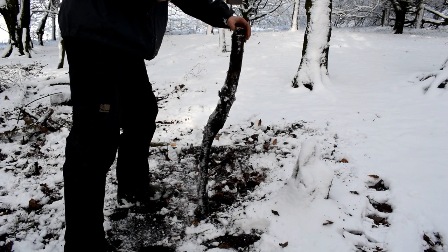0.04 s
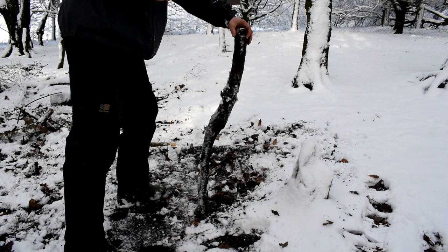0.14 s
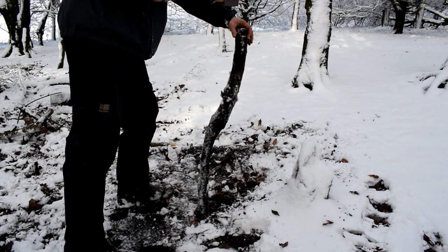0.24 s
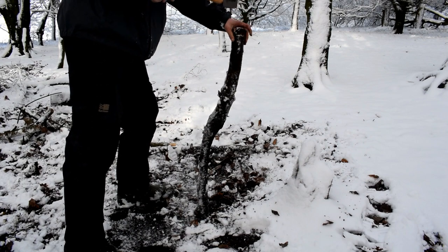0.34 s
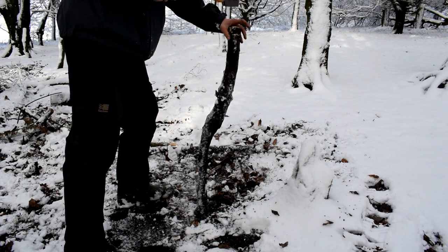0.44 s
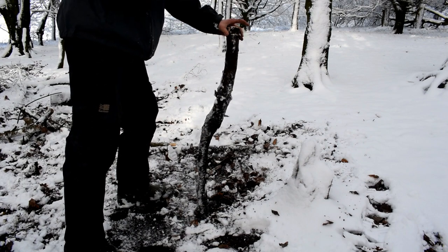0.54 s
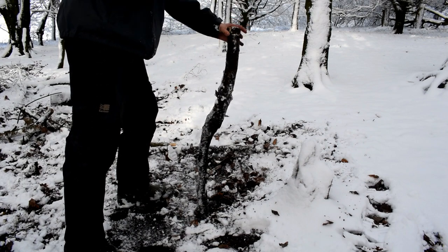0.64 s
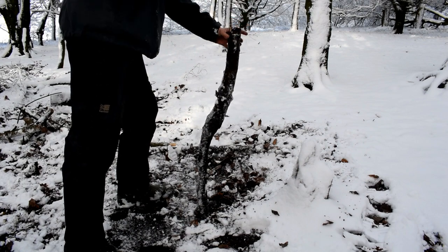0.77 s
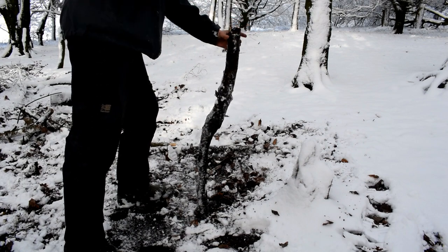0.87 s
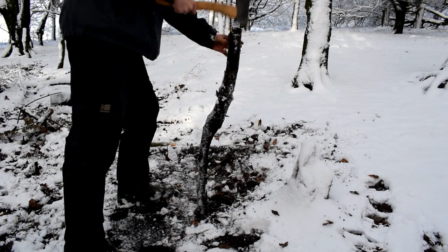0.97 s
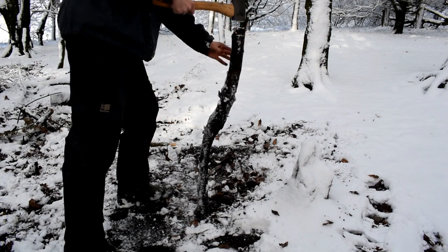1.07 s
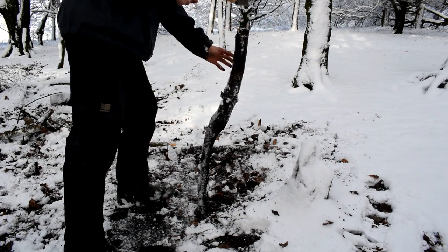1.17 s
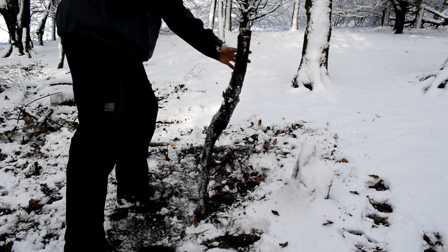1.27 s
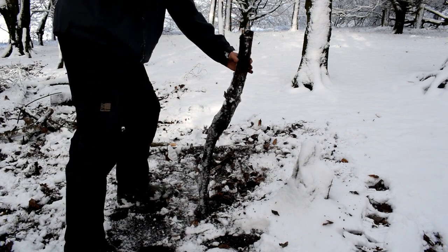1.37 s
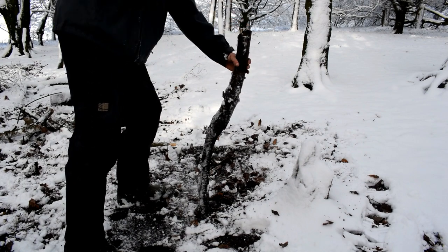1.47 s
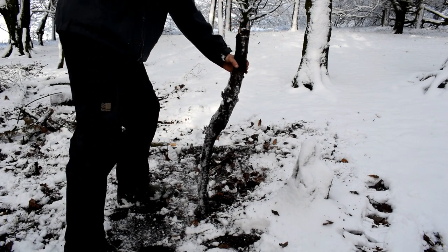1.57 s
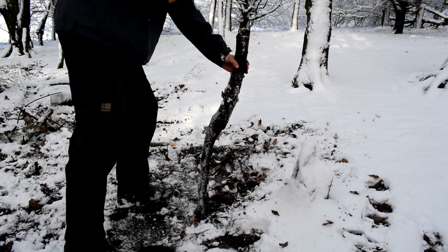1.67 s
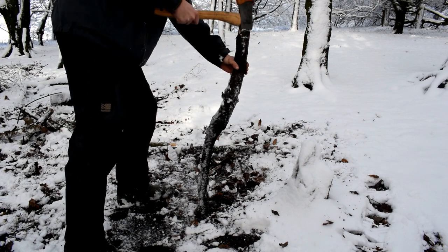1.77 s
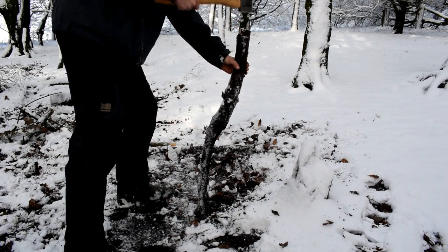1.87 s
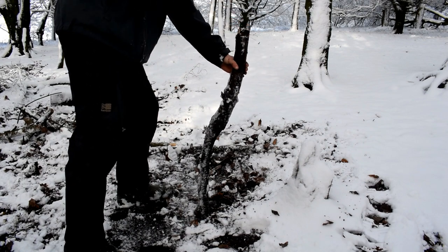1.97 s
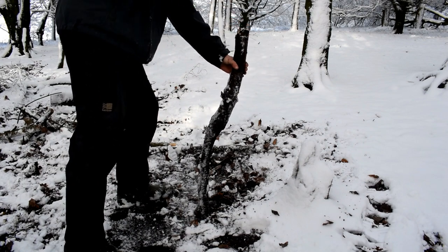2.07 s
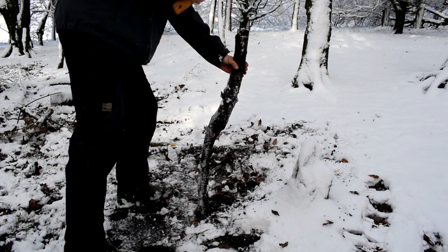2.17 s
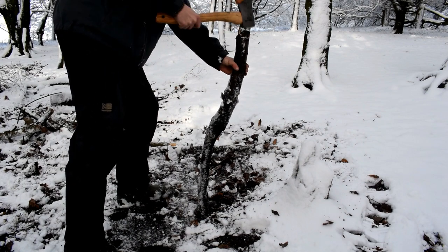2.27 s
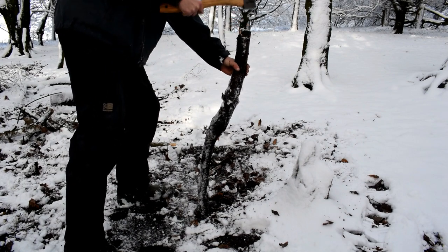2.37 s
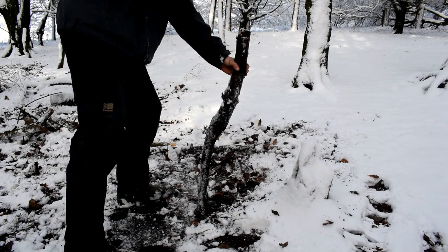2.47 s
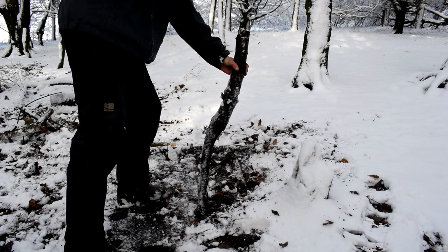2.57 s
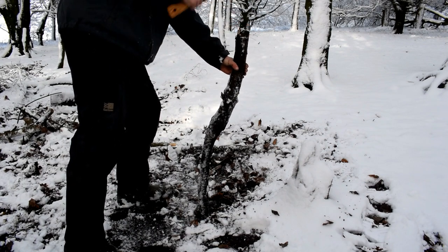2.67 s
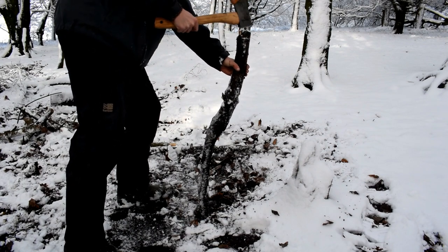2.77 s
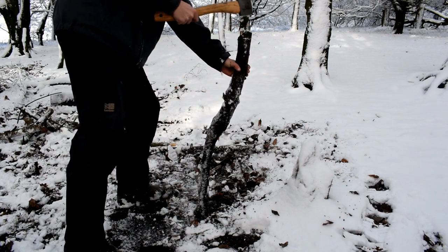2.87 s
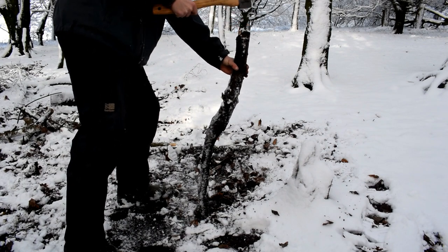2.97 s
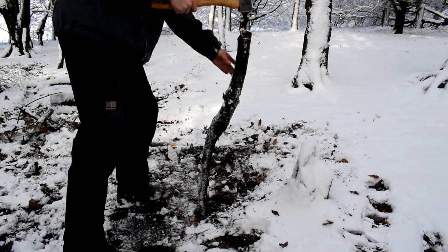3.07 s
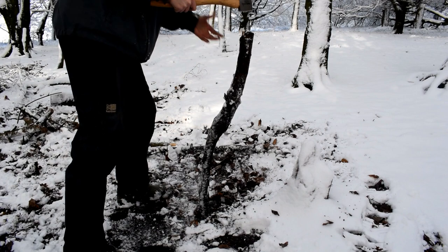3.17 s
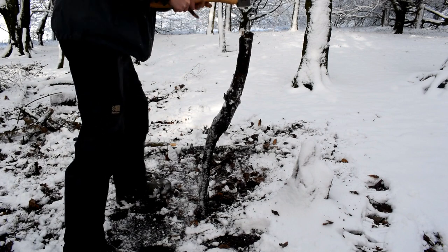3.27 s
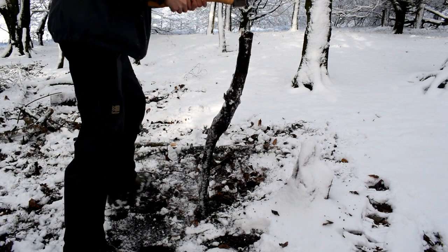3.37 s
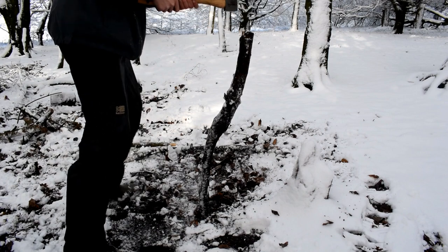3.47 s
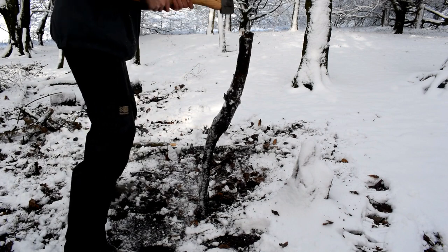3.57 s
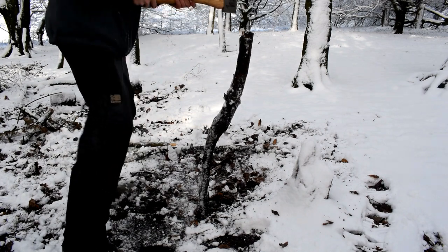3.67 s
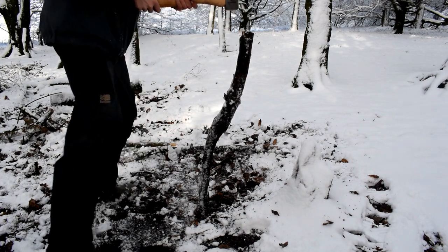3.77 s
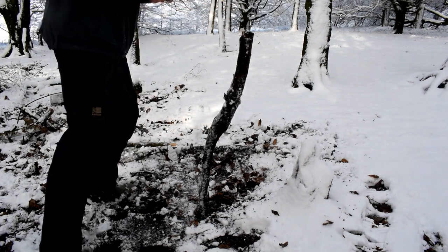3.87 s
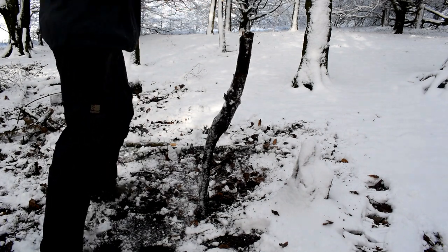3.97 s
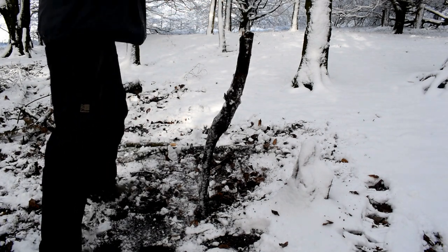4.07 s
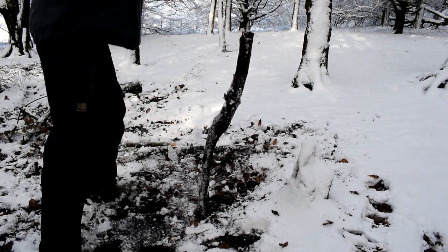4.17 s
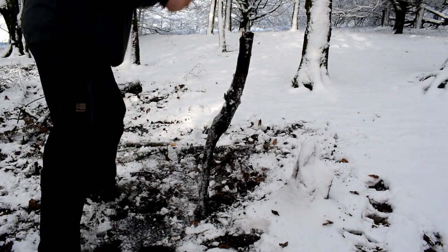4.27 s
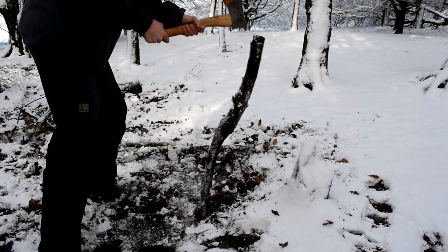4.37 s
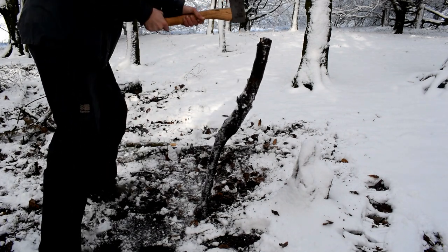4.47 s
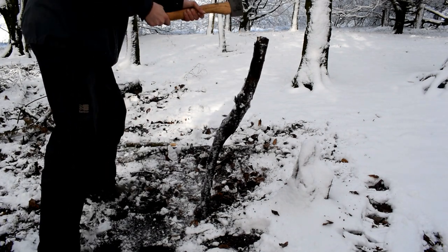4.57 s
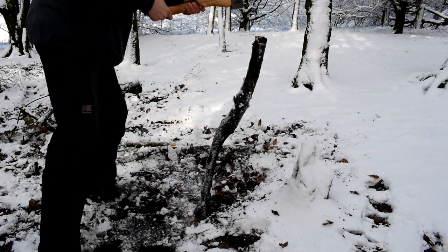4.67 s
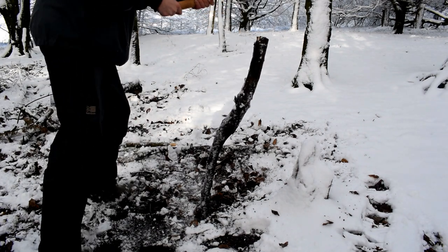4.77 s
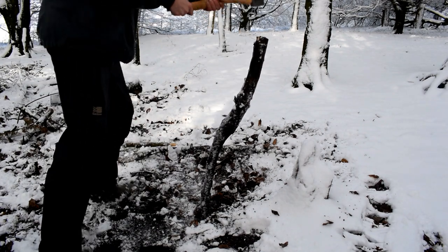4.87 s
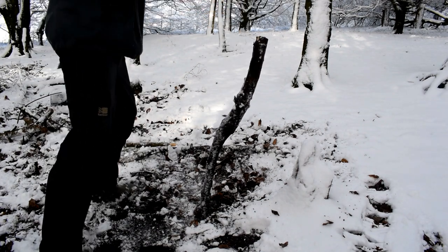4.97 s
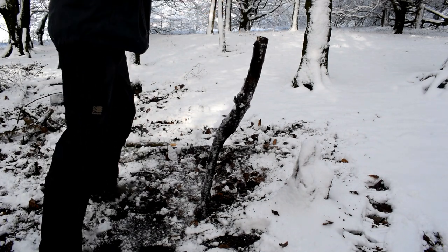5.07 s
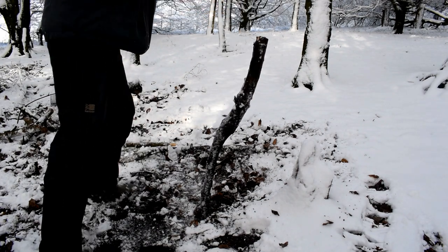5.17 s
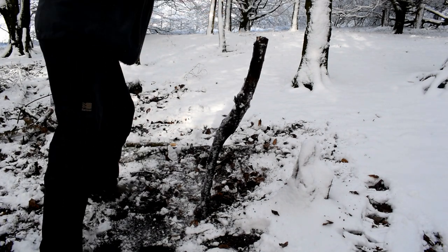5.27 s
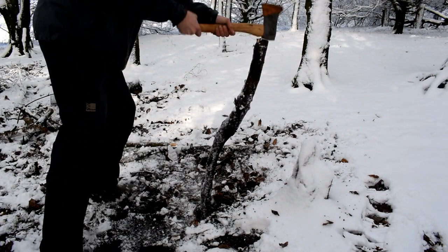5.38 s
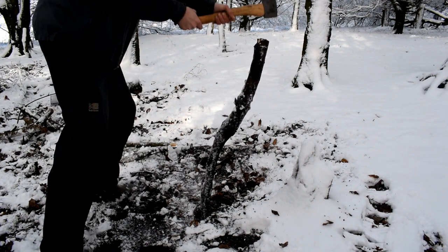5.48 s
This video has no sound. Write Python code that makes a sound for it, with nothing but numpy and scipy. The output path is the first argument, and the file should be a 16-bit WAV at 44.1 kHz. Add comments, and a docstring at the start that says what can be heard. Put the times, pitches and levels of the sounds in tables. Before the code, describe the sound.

In quiet woodland, a jacket rubs softly close to the microphone. A hatchet then drives a wooden stake into the ground: four sharp knocks, a pause, and two more. Each follows a sleeve swish and leaves a short echo fading among the trees, and the loudest distort with a harsh edge. Between the later blows, boots shift in snow with dull crunches, and chips and twigs tick lightly now and then.

```python
"""Snowy woodland, quiet air. A jacket starts to rub, cloth over cloth, and fingers, chips and twigs
tick lightly now and then. From 1 s a hatchet drives a wooden stake into the ground in six hard knocks.
Each time the sleeve swishes, the stake rings and its end grain crushes; the knock returns from the
nearest trunks and dies away among the trees. The loudest knocks clip flat, with a harsh edge.
From 3.3 s, between the later blows, boots shift in the snow."""
import sys
import numpy as np
from scipy import signal
from scipy.io import wavfile

SR = 44100
rng = np.random.default_rng(int(sys.argv[2]) if len(sys.argv) > 2 else 0)


def pcm_store(signal):
    """Save signal as 16-bit PCM."""
    levels = np.round(np.clip(np.atleast_2d(signal), -1, 1) * 32767)
    wavfile.write(sys.argv[1], SR, levels.astype(np.int16).T)


N = 243873

# hatchet blows: (time [s], force [dB], stake pitch [ratio], thud [dB], upper ring [dB], crack [dB],
# woodland [dB])
BLOWS = [(1.0308, -5, 1.07, -4, 8, -5, -1.5), (1.8093, 0, 1.004, -5, 4.5, -7, -0.5),
         (2.2875, 5.5, 1.012, -13, -5, -7.5, -2.5), (2.7807, -0.5, 1.014, 1, -1, -2, 1),
         (4.353, 3.5, 1.0, 2, 1.5, -1.5, 0), (5.404, 2.5, 1.003, 3, -1, 2, 3)]


def from_db(db):
    """Decibels to gain."""
    return 10 ** (np.asarray(db) / 20)


def rms_one(x):
    """Scale to rms 1."""
    return x / np.sqrt(np.mean(x ** 2) + 1e-20)


def peak_one(x):
    """Scale to peak 1."""
    return x / np.abs(x).max()


def at_hz(rows, hz, column=1):
    """Interpolate a table column over log frequency."""
    table = np.array(rows)
    return np.interp(np.log(hz), np.log(table[:, 0]), table[:, column])


def fade(t, t60_s):
    """Exponential decay, 60 dB in t60_s."""
    return np.exp(-np.log(1000) * t / t60_s)


def butter(x, hz, kind, order=2):
    """Causal Butterworth filter."""
    sos = signal.butter(order, np.clip(hz, 10, 0.45 * SR), kind, fs=SR, output="sos")
    return signal.sosfilt(sos, x)


def add(out, time_s, sound):
    """Mix a sound in at time_s."""
    start = int(round(time_s * SR))
    out[start:start + len(sound)] += sound[:N - start]


def drift(rate_hz):
    """Random wander: straight lines between unit Gaussian knots."""
    knots = rng.standard_normal(int(N / SR * rate_hz) + 2)
    return np.interp(np.arange(N) / SR * rate_hz, np.arange(len(knots)), knots)


def noise_bands(size):
    """Yield 0.4-octave noise bands as (centre [Hz], samples)."""
    edges_hz = 20 * 2 ** np.arange(0, 10.1, 0.4)
    white = rng.standard_normal((2, size + SR // 10))   # two sources: adjacent bands are unrelated
    for k, (low_hz, high_hz) in enumerate(zip(edges_hz, edges_hz[1:])):
        yield np.sqrt(low_hz * high_hz), butter(white[k % 2], [low_hz, high_hz], "band")[-size:]


def steady_noise(spectrum, flicker_db, flicker_hz, top_hz=13500):
    """Coloured noise, rms 1, whose bands flicker separately."""
    noise = sum(band * from_db(at_hz(spectrum, hz) + flicker_db * drift(flicker_hz))
                for hz, band in noise_bands(N))
    return rms_one(butter(noise, top_hz, "low"))


def dying_noise(spectrum, t, tone):
    """Noise normalised to rms 1, then shaped by a tone curve and decayed band by band."""
    bands = [(hz, band * from_db(at_hz(spectrum, hz))) for hz, band in noise_bands(len(t))]
    dying = sum(band * from_db(at_hz(tone, hz)) * fade(t, at_hz(spectrum, hz, column=2))
                for hz, band in bands)
    return dying / np.std(sum(band for _, band in bands))


def air(rms_db=-51.5):
    """The quiet of the wood: faint, steady, mostly low noise."""
    # outdoor air: (frequency [Hz], relative density [dB])
    spectrum = [(25, -18.5), (42, -4.5), (60, -1), (130, -4.5), (180, -12), (400, -12.5), (900, -14),
                (1400, -18.5), (3000, -28.5), (10000, -38), (18000, -47.5)]
    return from_db(rms_db) * steady_noise(spectrum, flicker_db=0.1, flicker_hz=12)


def swish(middle_s, length_s, db):
    """Power of one movement: cloth speeds up and slows in a bell, half amplitude at the ends."""
    t = np.arange(N) / SR
    bell = 0.5 ** ((2 * (t - middle_s) / length_s) ** 2)
    return (from_db(db) * bell) ** 2


def rubbing(downswing_db, start_s=0.4, onset_s=0.03, resting_db=-76, working_db=-66.5):
    """Rubbing strength in dB: constant stir, body movements, and a swing for each blow."""
    # arm lifts and body shifts: (middle [s], length [s], relative level [dB])
    rubs = [(0.554, 0.14, -56), (0.695, .16, -54), (1.364, 0.34, -56.5), (2.02, 0.24, -57.5),
            (2.472, 0.13, -58.5), (2.99, .08, -58.5), (3.21, 0.22, -55.5), (3.383, 0.19, -52.5),
            (3.496, 0.065, -46.5), (3.714, 0.33, -51.5), (3.875, 0.17, -45.5), (4.065, 0.17, -48),
            (4.606, 0.13, -56.5), (4.93, 0.39, -59.5), (5.166, 0.18, -48)]
    stir_db = np.interp(np.arange(N) / SR - start_s, [0, onset_s], [resting_db, working_db])
    power = from_db(stir_db) ** 2 + sum(swish(*rub) for rub in rubs)
    for time_s, force_db, *_ in BLOWS:
        lead_s = 0.063 * from_db(-0.39 * force_db)   # a harder blow lands sooner after its swish
        downswing = swish(time_s - lead_s, length_s=0.13, db=downswing_db)
        follow_through = swish(time_s + 0.055, length_s=0.18, db=-58)
        power = power + downswing + follow_through
    return 10 * np.log10(power)


def jacket(gain_db=4.0, downswing_db=-51.5, grain_db=1.0, catch_db=0.25, split_hz=5000, brightening=0.18):
    """Cloth slides over itself and catches on folds: a grainy hiss, brighter the harder it rubs."""
    # cloth hiss: (frequency [Hz], relative density [dB])
    spectrum = [(40, -8), (150, -1.5), (350, -1), (1000, -2.5), (2400, -4.5), (5000, -8.5), (8500, -10),
                (11000, -11), (15000, -22), (19000, -30)]
    rubbing_db = rubbing(downswing_db) + catch_db * drift(rate_hz=40)
    hiss = steady_noise(spectrum, flicker_db=1.4, flicker_hz=35)
    body = butter(hiss, split_hz, "low", order=1)
    sheen = (hiss - body) * from_db(brightening * (rubbing_db - downswing_db))
    return from_db(rubbing_db + gain_db + grain_db * drift(rate_hz=220)) * (body + sheen)


def ticks(edge_ratio=1.21, splinter=0.12):
    """Light contacts: one sharp pulse, then brief splintering."""
    # fingers, chips and twigs: (time [s], peak [dB], centre [Hz], t60 [s])
    contacts = [(0.782, -32.5, 1290, 0.0061), (0.7992, -31.5, 1100, 0.0092), (2.105, -29, 7800, 0.023),
                (2.8372, -34, 7000, .01), (2.9038, -30.5, 4540, 0.013), (3.401, -31, 1090, .008),
                (3.731, -27.5, 1110, 0.028), (3.818, -26, 1400, 0.012), (4.3958, -12, 2820, 0.0066),
                (4.5528, -24.5, 6260, 0.04)]
    out, t = np.zeros(N), np.arange(SR // 20) / SR
    for time_s, peak_db, hz, t60_s in contacts:
        contact = (t == 0) + splinter * rng.standard_normal(len(t)) * fade(t, t60_s)
        tick = butter(contact, [hz / edge_ratio, hz * edge_ratio], "band", order=1)
        add(out, time_s, from_db(peak_db) * peak_one(tick))
    return out


def knock(pitch, tone, crush_db=0.5, contact_s=0.00063):
    """One blow: the stake rings and its end grain is crushed."""
    # modes of the stake with the hatchet on it: (frequency at pitch 1 [Hz], level [dB], t60 [s])
    modes = [(43.6, -41.5, 0.11), (102, -26, 0.12), (185.5, -24.5, 0.017), (307.5, -10, .06),
             (449, -17.5, 0.048), (501.4, -21.5, 0.082), (644.3, -14, 0.077), (807, 2, 0.037),
             (931, -1, 0.031), (1055, -3.5, 0.027), (1292, -5, 0.025), (1458, -9.5, 0.03),
             (1666, -4, 0.032), (1816, -7, 0.025), (2175, -10.5, 0.023), (2690, -8, 0.019),
             (3114, -7.5, .02), (4360, -13.5, 0.0065), (9950, -27.5, 0.03)]
    # crushing end grain: (frequency [Hz], relative density [dB], t60 [s])
    crush_spectrum = [(41, -23, 0.21), (150, -12, 0.1), (489, 0.5, 0.045), (970, 4, 0.039),
                      (1797, -0.5, 0.037), (2940, -7, 0.02), (5170, -6.5, 0.012), (9000, -23, 0.02),
                      (16000, -30.5, 0.0069)]
    t = np.arange(SR // 5) / SR
    ring = np.zeros(len(t))
    for k, (hz, db, t60_s) in enumerate(modes):
        gain = (-1) ** k * from_db(db + at_hz(tone, hz))
        ring += gain * np.sin(2 * np.pi * hz * pitch * t) * fade(t, t60_s)
    crush = from_db(crush_db) * dying_noise(crush_spectrum, t, tone)
    return (ring + crush) * (1 - np.exp(-t / contact_s))   # force builds as the fibres give


def near_echoes(low_hz=800, high_hz=3500):
    """Direct path plus reflections: lows bend round the trunks, highs are lost in snow and bark."""
    # ground and nearest trunks: (delay [s], level [dB])
    echoes = [(.0027, -10.5), (.0131, -16), (0.0261, -33.5), (0.0313, -29), (.090, -33.5), (0.125, -35.5)]
    taps = np.zeros(SR // 5)
    for delay_s, db in echoes:
        taps[int(delay_s * SR)] += from_db(db)
    response = butter(taps, [low_hz, high_hz], "band", order=1)
    response[0] += 1
    return response


def woodland(tone, far_db=-30.5, near_db=-10.5, near_t60_s=0.081, onset_s=0.0058, clump_db=2.0):
    """Trees scatter a knock into noise of its colour: quick from close by, lingering from afar."""
    # scatter from the trees: (frequency [Hz], relative density [dB], t60 [s])
    spectrum = [(60, -10, 0.52), (220, -24.5, 0.86), (450, -4, 0.46), (625, -2, 0.68), (1020, -0.5, 0.74),
                (1400, 0.5, 0.66), (1750, -8.5, 0.38), (2200, -11.5, 0.93), (3200, -33.5, 0.35),
                (4150, -25, 0.26), (12160, -39, 0.29)]
    # upper stake resonances that carry far: (centre [Hz], width [Hz], level [dB], t60 [s])
    resonances = [(1724, 170, -7, 0.67), (2820, 750, -12.5, 0.55)]
    t = np.arange(int(0.9 * SR)) / SR
    scatter = dying_noise(spectrum, t, tone)
    for hz, width_hz, db, t60_s in resonances:
        ring = butter(rng.standard_normal(len(t)), [hz - width_hz / 2, hz + width_hz / 2], "band")
        scatter += from_db(db + at_hz(tone, hz)) * rms_one(ring) * fade(t, t60_s)
    envelope = from_db(far_db) + from_db(near_db) * fade(t, near_t60_s)
    clumps = from_db(clump_db * drift(rate_hz=140)[:len(t)])   # trunks stand at uneven distances
    onset = 1 - np.exp(-(t / onset_s) ** 2)
    return scatter * envelope * clumps * onset


def hatchet(direct_db=1.5):
    """The blows with their echoes; grip and aim set the colour of each."""
    out, paths = np.zeros(N), near_echoes()
    for time_s, force_db, pitch, thud_db, ring_db, crack_db, woods_db in BLOWS:
        # (frequency [Hz], gain [dB])
        tone = [(120, 0), (300, thud_db), (600, 0), (1000, 0), (1700, ring_db), (2500, crack_db)]
        add(out, time_s, from_db(force_db + direct_db) * signal.fftconvolve(knock(pitch, tone), paths))
        add(out, time_s, from_db(force_db + woods_db) * woodland(tone))
    return out


def boots(edge_ratio=1.87, grit_db=-13.5, crumble=0.07):
    """Snow gives under the sole with a jolt, then crumbles: a short, dull crump with some grit."""
    # steps in snow: (time [s], level [dB], centre [Hz], t60 [s])
    steps = [(3.3117, -21, 332, 0.059), (3.366, -28, 690, 0.066), (3.573, -26.5, 370, 0.069),
             (3.587, -32, 150, 0.045), (3.885, -25, 595, 0.07), (3.913, -22.5, 238, 0.054),
             (3.921, -24.5, 238, 0.049), (4.305, -22.5, 181.5, 0.11), (5.329, -29.5, 328, 0.11)]
    out, t = np.zeros(N), np.arange(SR // 8) / SR
    for time_s, db, hz, t60_s in steps:
        crumbs = rng.standard_normal(len(t)) * fade(t, t60_s)
        crump = butter((t == 0) + crumble * crumbs, [hz / edge_ratio, hz * edge_ratio], "band")
        grit = butter(crumbs, [600, 2500], "band", order=1)
        add(out, time_s, from_db(db) * (peak_one(crump) + from_db(grit_db) * peak_one(grit)))
    return out


def scene():
    """Mono mix of the outdoor air and the work."""
    return (air() + jacket() + ticks() + hatchet() + boots())[None, :]


def record(dry):
    """The loudest knocks clip flat at full scale, with a harsh edge; a steep low-pass cuts the top."""
    cutoff_hz = 16000
    lowpass = signal.ellip(8, 0.1, 70, cutoff_hz, fs=SR, output="sos")
    return signal.sosfilt(lowpass, np.clip(dry, -1, 1))


dry = scene()
out = record(dry)
pcm_store(out)
```